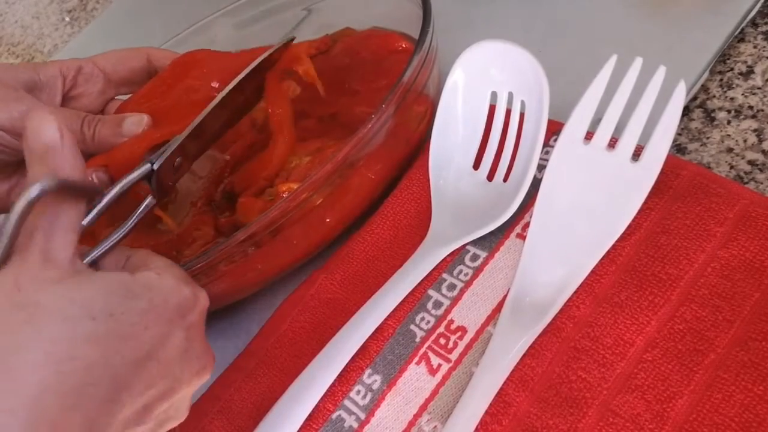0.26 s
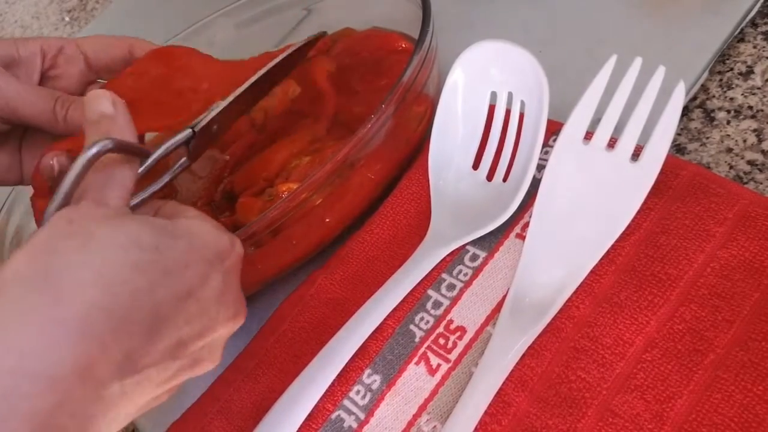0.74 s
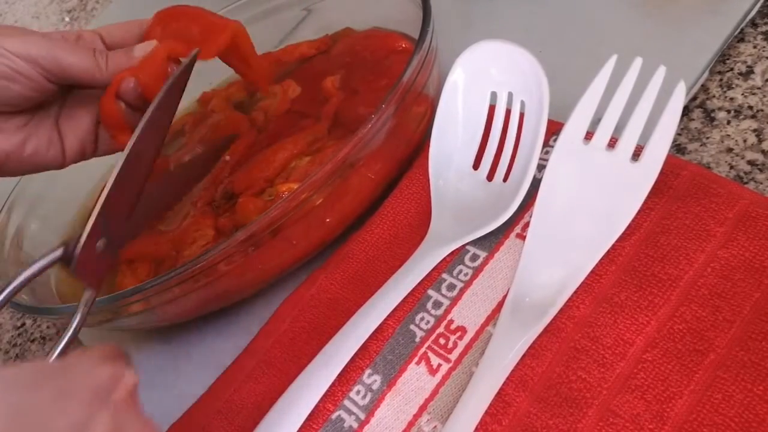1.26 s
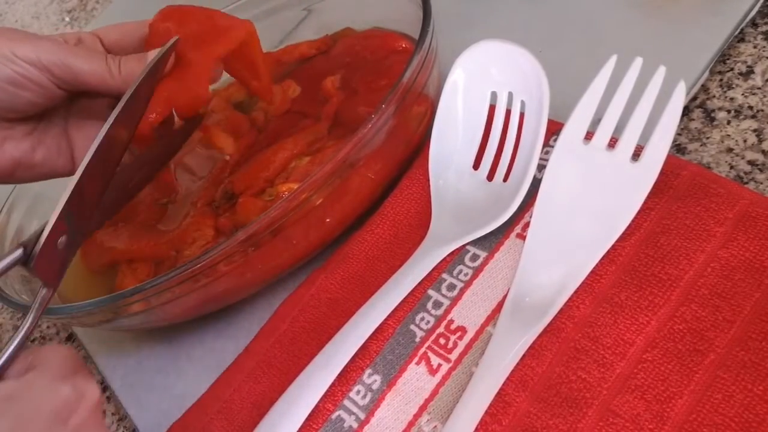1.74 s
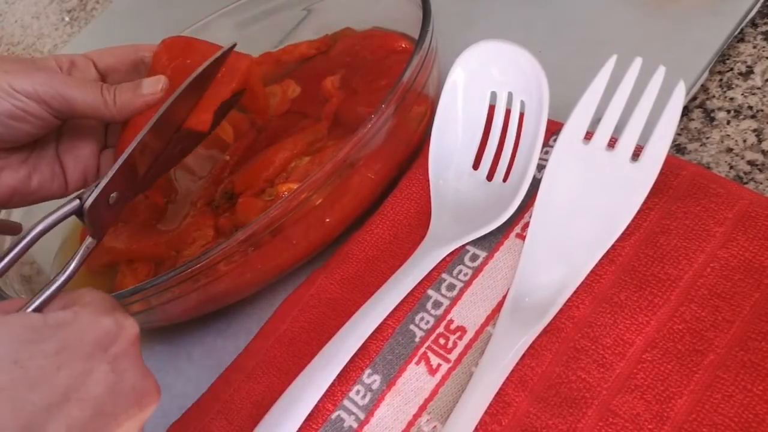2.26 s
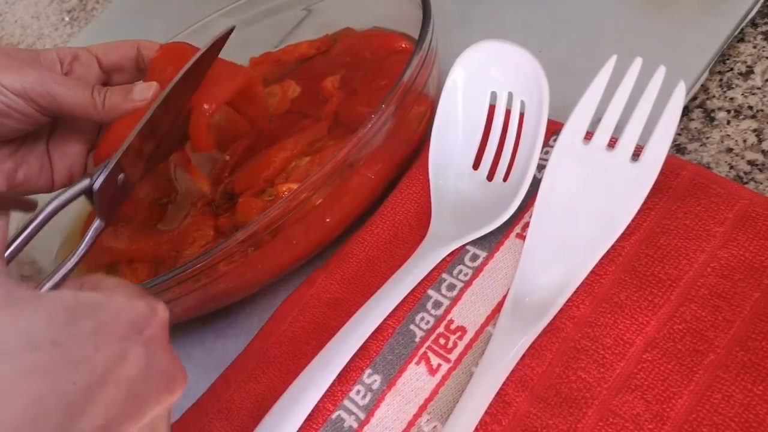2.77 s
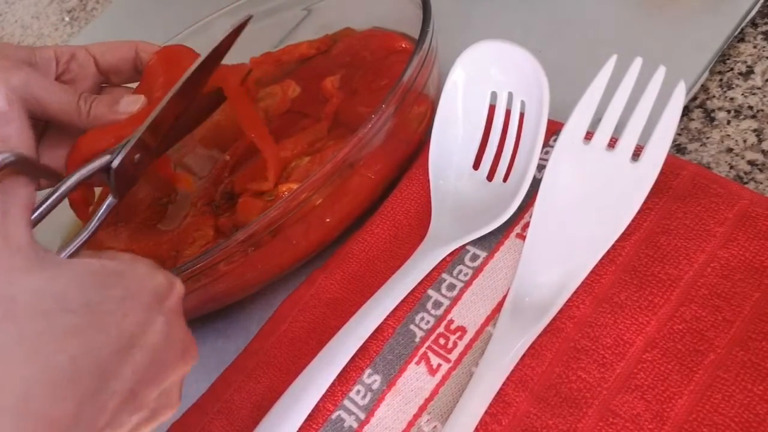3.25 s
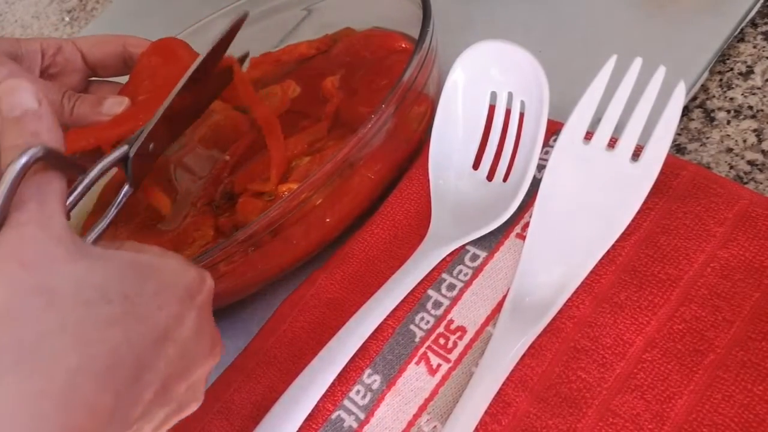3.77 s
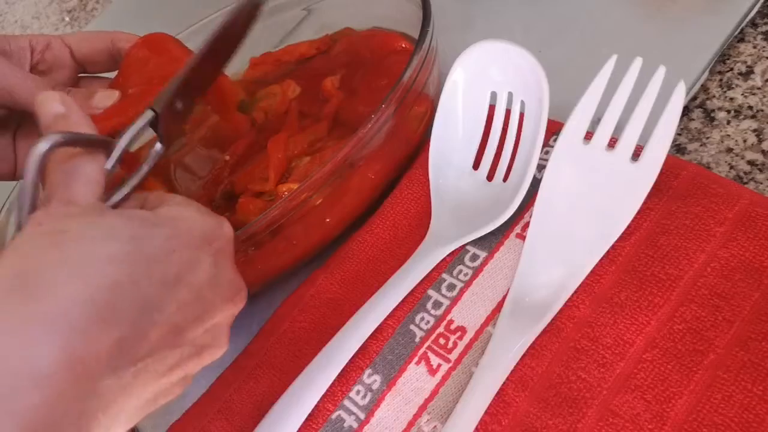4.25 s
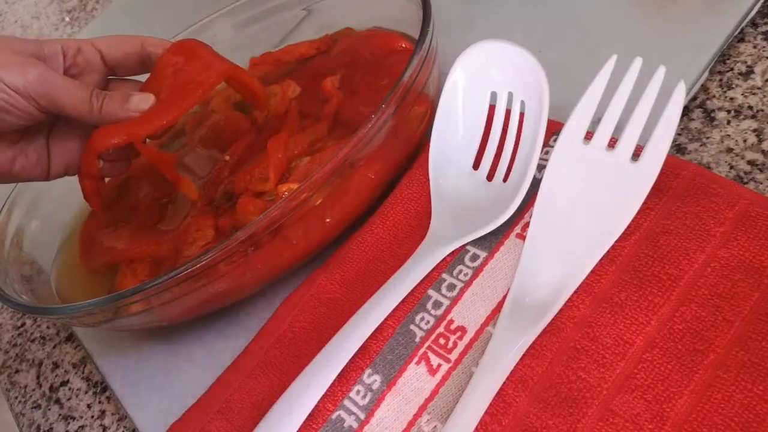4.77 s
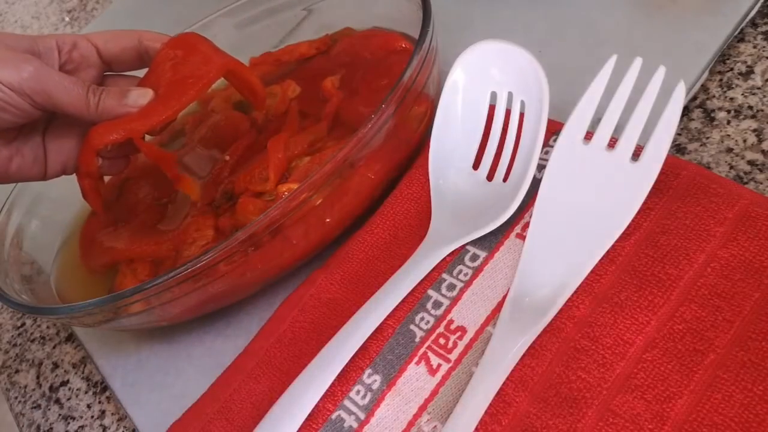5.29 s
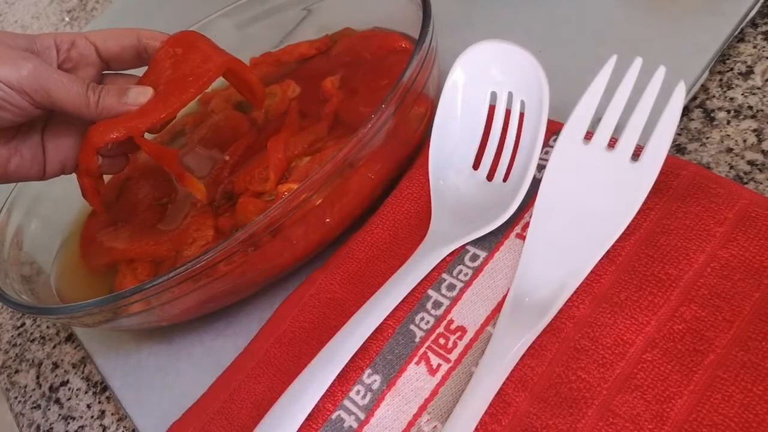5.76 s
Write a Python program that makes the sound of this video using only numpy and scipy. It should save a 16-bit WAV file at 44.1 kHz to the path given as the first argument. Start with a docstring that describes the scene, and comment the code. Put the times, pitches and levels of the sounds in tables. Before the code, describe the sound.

A very quiet kitchen with soft hiss and low rumble. Scissor blades scrape briefly and snap sharply, then steel knocks a glass dish with a short clear ring. Faint rubbing and tiny clicks follow while soft food is cut, then a second bright snap. All sound cuts out for an instant, returns with a faint scrape, and sinks away. Close stereo microphone, scissors slightly right, small room.

```python
"""Steel kitchen scissors cut soft peppers in a glass dish, a little to the right in the stereo picture.
Filtered noise makes a soft kitchen hiss, drone and rumble from the start, with faint wavering sine hums.
Blades rub as swelling grainy noise, with sine squeaks and a dull rustle; two loud snaps and some faint ones
ring the blade modes, one knock rings the glass after the first loud snap, and a small room answers.
Late on, all sound drops out for a moment; the background sinks towards the end."""
import sys
import numpy as np
from scipy import signal
from scipy.fft import rfft, irfft, next_fast_len
from scipy.io import wavfile
from scipy.ndimage import uniform_filter1d

SR = 44100
rng = np.random.default_rng(int(sys.argv[2]) if len(sys.argv) > 2 else 0)


def dump(signal):
    """Clip the signal to [-1, 1] and save it as 16-bit WAV at the path in sys.argv[1]."""
    limited = np.clip(np.atleast_2d(signal).T, -1, 1)
    pcm = np.round(limited * 32767).astype(np.int16)
    wavfile.write(sys.argv[1], SR, pcm)


N = 265570
SIZE = next_fast_len(N, real=True)
T = np.arange(N) / SR  # s, every sample
MS = np.arange(0, N / SR, .001)  # s, every millisecond


def undb(db):
    """Amplitude factor of a level in dB."""
    return 10 ** (np.asarray(db) / 20)


def level(x, db):
    """The sound scaled to an rms level in dB."""
    return x * undb(db) / np.sqrt(np.mean(x ** 2))


def peak_of(sound):
    """Loudest rms over 128 samples, both channels together."""
    power = uniform_filter1d(np.mean(sound ** 2, axis=0), size=128)
    return np.sqrt(np.max(power))


def on_log_axis(table, size):
    """Gain at each bin of a transform from (Hz, dB) points."""
    hz, db = np.transpose(table)
    bins = np.fft.rfftfreq(size, 1 / SR) + 1
    return undb(np.interp(np.log(bins), np.log(hz), db))


def coloured(x, gain):
    """Each bin of the sound scaled by a gain."""
    return irfft(rfft(x, SIZE) * gain, SIZE)[..., :N]


def noise(table):
    """Steady noise of the given colour, rms 1."""
    return level(coloured(rng.standard_normal(SIZE), on_log_axis(table, SIZE)), 0)


def causal(table, size=1024):
    """Short causal response of the given colour, from the folded cepstrum."""
    ceps = irfft(np.log(on_log_axis(table, size)), size)
    ceps[1:size // 2] *= 2
    ceps[size // 2 + 1:] = 0
    return irfft(np.exp(rfft(ceps)), size)


def band(x, low_hz, high_hz):
    """The sound through a gentle band-pass."""
    edges = [low_hz, min(high_hz, .45 * SR)]
    return signal.sosfilt(signal.butter(2, edges, "band", fs=SR, output="sos"), x)


def walk(rate):
    """Random levels, a new one every 1 / rate s, joined by straight lines."""
    count = int(N / SR * rate) + 2
    return np.interp(T * rate, np.arange(count), rng.standard_normal(count))


def panned(x, pan_db):
    """The sound in stereo, pan_db louder on the left than on the right."""
    return x * undb(np.array([[pan_db / 2], [-pan_db / 2]]))


SKIRT_DB, SKIRT_STRETCH = -31, 7.0  # a faint drag around every swell, this much lower and slower


def swell(s, db, rise, fall):
    """Gain that climbs and sinks evenly in dB, on a low slow skirt; one value a millisecond."""
    away = np.where(MS < s, (s - MS) / rise, (MS - s) / fall)
    return undb(db - 20 * away) + undb(db + SKIRT_DB - 20 * away / SKIRT_STRETCH)


# Colour of the hiss. Each row: frequency in Hz, density in dB per Hz (relative).
KITCHEN_COLOUR = [(240, -39), (400, -6), (570, -4), (666, -6), (765, -2), (1030, -3.5), (1440, -2.5),
                  (1840, -0.5), (3160, -10), (5600, -16), (6340, -17), (14400, -26), (16000, -32)]
# Stereo width of hiss and drone. Each row: frequency in Hz, side minus mid in dB.
KITCHEN_WIDTH = [(60, -26), (110, -24.5), (200, -15), (380, -0.5), (700, 4.5), (1290, -5), (2380, 3),
                 (4400, -0.5), (8120, 0), (15000, 0)]
# Colours of the drone, the deep rumble and the boom. Each row: frequency in Hz, density in dB per Hz (relative).
DRONE_COLOUR = [(91, -31.5), (155, 1), (167, -6.5), (204, -3.5), (231, -2.5), (254, -14), (302, -8.5),
                (328, -17.5), (363, -14), (394, -27), (410, -28.5), (530, -56.5), (900, -120)]
DEEP_COLOUR = [(8, -42), (14, -8), (25, -7), (33, -4), (38, -1), (45, -4), (54, -9.5), (64, -23.5),
               (90, -55), (150, -120)]
BOOM_COLOUR = [(35, -33.5), (60, -5.5), (65, -7.5), (92, 0), (108, 5.5), (145, -8), (165, -20), (210, -51),
               (360, -120)]
# Rise and fall of the rumble. Each row: time in seconds, deep rumble in dB, boom in dB (both before trims).
RUMBLE_LEVELS = [(0.0, -55, -64), (0.6, -54, -62), (0.9, -54.5, -64), (1.1, -52, -58), (1.3, -58, -61),
                 (1.9, -56, -60), (2.5, -56, -60), (3.1, -56, -57.5), (3.7, -60, -56.5), (4.0, -54, -55),
                 (4.2, -65, -64), (4.6, -54, -59), (4.86, -48, -61), (5.15, -55, -56), (5.6, -58, -59),
                 (6.02, -61, -62)]
HISS_DB, DRONE_DB, SIDE_BOOM_DB = -79.5, -74, -85.5  # before the background fade
RUMBLE_TRIM_DB, RUMBLE_WAVER_DB, RUMBLE_WAVER_PER_S = -3.5, 1.2, 5.5


def hiss_and_drone():
    """Two coloured noises: the hiss level wavers, the drone stays steady."""
    hiss = undb(HISS_DB + 0.95 * walk(4.1)) * noise(KITCHEN_COLOUR)
    return hiss + undb(DRONE_DB) * noise(DRONE_COLOUR)


def kitchen():
    """A hiss that differs left and right, over a drone and rumble that are nearly alike on both sides."""
    mid, side = hiss_and_drone(), hiss_and_drone()
    side = coloured(side, on_log_axis(KITCHEN_WIDTH, SIZE))
    side = side + undb(SIDE_BOOM_DB) * noise(BOOM_COLOUR)
    s, deep_db, boom_db = np.transpose(RUMBLE_LEVELS)
    for db, colour in ((deep_db, DEEP_COLOUR), (boom_db, BOOM_COLOUR)):
        waver_db = RUMBLE_WAVER_DB * walk(RUMBLE_WAVER_PER_S)
        mid = mid + undb(np.interp(T, s, db) + RUMBLE_TRIM_DB + waver_db) * noise(colour)
    return np.array([mid + side, mid - side])


# Faint background tones that come and go. Each row: start in seconds, end in seconds, first pitch in Hz,
# last pitch in Hz, level in dB (before the background fade).
HUM_TONES = [(-.2, 3.7, 40.84, 35.83, -54), (-.2, 0.76, 202, 196.9, -72), (-.1, 1.13, 112, 128.2, -66.5),
             (1.2, 2.22, 131, 138, -65), (1.1, 2.9, 100, 102.8, -66.5), (2.9, 4.15, 86.6, 80.2, -64),
             (1.0, 2.58, 228.4, 224.2, -76.5), (1.2, 2.67, 300.8, 301.2, -85), (2.3, 3.08, 1880, 1879, -85),
             (2.5, 3.9, 1180, 1170, -89), (3.2, 3.4, 876, 803, -92)]


def hums():
    """Sines that fade in and out while their level and pitch waver."""
    out = np.zeros(N)
    for start, end, first_hz, last_hz, db in HUM_TONES:
        done = np.clip((T - start) / (end - start), 0, 1)
        hz = (first_hz + (last_hz - first_hz) * done) * (1 + .012 * walk(7.3))
        fade = np.clip(5 * np.minimum(done, 1 - done), 0, 1)
        tone = np.sin(2 * np.pi * (np.cumsum(hz) / SR + rng.random()))
        out += fade * undb(db + 0.91 * walk(9)) * tone
    return out


# Gain of everything behind the scissors. Each row: time in seconds, gain in dB.
BACKGROUND_FADE = [(5.0, 4), (5.5, 2), (5.8, 2.5), (6.02, -1)]


def background():
    """Kitchen and hums under one gain that sinks towards the end."""
    return (kitchen() + hums()) * undb(np.interp(T, *np.transpose(BACKGROUND_FADE)))


# Blades sliding over each other. Each row, one stroke: peak in seconds, swell level in dB, centre of the
# scrape in Hz, rise in seconds per 20 dB, fall in seconds per 20 dB.
BLADE_STROKES = [(0.112, -84, 6100, .18, .12), (0.19, -81, 7050, .06, .047), (0.352, -84, 6900, .1, .2),
                 (0.751, -46.5, 8000, .013, .014), (0.938, -49, 7900, .0095, .03),
                 (2.466, -78, 6800, .16, .14), (2.606, -80, 6500, .024, .19), (2.97, -74, 7500, .14, .11),
                 (3.114, -72, 6600, .009, .1), (3.55, -83, 6900, .25, .17), (3.718, -77, 7100, .04, .09),
                 (4.204, -53.5, 7500, .021, .019), (4.394, -52, 9470, .01, .021),
                 (4.468, -67, 6200, .021, .064), (5.0, -65, 9300, .05, .04), (5.202, -80.5, 7000, .1, .075)]
# Resonances of the blades. Each row: frequency in Hz, width in Hz, level in dB (used by the snaps only).
BLADE_RESONANCES = [(1620, 300, -19), (5600, 300, -7.5), (7580, 1200, -10), (9430, 450, 3),
                    (11800, 500, -12), (12500, 500, -14)]


def rubbing():
    """Dense slips along the edges hiss around the centre of the scrape and ring the blade modes near it."""
    swells = [swell(s, db, rise, fall) for s, db, _, rise, fall in BLADE_STROKES]
    swells = np.array(swells) + 1e-12  # keeps the average below defined
    # the louder a stroke is, the more it pulls the centre to its own
    centre = np.array(BLADE_STROKES)[:, 2] @ swells ** 2 / np.sum(swells ** 2, axis=0)
    centre = np.interp(T, MS, centre)
    gain = np.interp(T, MS, swells.sum(0))
    slips = rng.standard_normal((2, N)) * undb(0.93 * rng.exponential(size=N))
    out = level(band(slips, 1500., 13000.0), -5)
    for hz in 3000 * 2 ** np.arange(0, 2.6, .5):
        near = np.exp(-(np.log2(hz / centre) / 0.42) ** 2)
        out += level(band(slips, hz / 1.3, hz * 1.1), -3) * near
    for hz, width, _ in BLADE_RESONANCES:
        near = np.exp(-(np.log2(hz / centre) / 0.56) ** 2)
        out += level(band(slips, hz - width / 2, hz + width / 2), -14) * near
    flicker = undb(2.5 * walk(210) - 1.5)
    return panned(gain * flicker * out, -5)


# Short narrow squeaks from the blades. Each row: peak in seconds, pitch in Hz, level in dB (before flutter
# and pan), length in seconds.
BLADE_SQUEAKS = [(.16, 11300, -84, 0.037), (.948, 2310, -53, 0.012), (2.43, 11050, -85, 0.045),
                 (2.68, 8680, -85, 0.033), (2.935, 10540, -83, 0.043), (2.96, 7600, -82, .04),
                 (3.015, 6200, -80.5, .04), (3.119, 3220, -64.5, 0.0089), (3.122, 6650, -67, 0.016),
                 (3.17, 11100, -83, 0.033), (3.62, 10440, -84.5, 0.063), (3.72, 5420, -80, .02),
                 (4.475, 6390, -67, 0.015), (5.0, 11300, -69.5, .03), (5.21, 9430, -87, .07)]
SQUEAK_FLUTTER_DB, SQUEAK_FLUTTER_PER_S = 3.2, 180


def squeaks():
    """Each squeak is a sine that swells, wavers in pitch, flutters in level and dies."""
    out = np.zeros(N)
    for s, hz, db, length in BLADE_SQUEAKS:
        start = int((s - length) * SR)
        t = np.arange(int(2 * length * SR)) / SR
        drift = uniform_filter1d(rng.standard_normal(len(t)), size=200) * np.sqrt(200)
        tone = np.sin(2 * np.pi * np.cumsum(hz * (1 + .02 * drift)) / SR)
        bump = np.exp(-((t - length) / (0.7 * length)) ** 2)
        out[start:start + len(t)] += undb(db) * bump * tone
    flutter = undb(SQUEAK_FLUTTER_DB * (walk(SQUEAK_FLUTTER_PER_S) - .4))
    return panned(out * flutter, -4.5)


# A dull rustle. Each row: peak in seconds, swell level in dB, rise in seconds per 20 dB, fall in seconds per 20 dB.
RUSTLE_SWELLS = [(.752, -59, .012, .012), (.945, -72, .028, .033), (1.46, -80, .16, .14),
                 (3.114, -69, .006, .06), (4.95, -73.5, .3, .1)]


def rustle():
    """Soft grainy noise in the low treble."""
    grains = rng.standard_normal((2, N)) * undb(2 * walk(60))
    gain = np.interp(T, MS, sum(swell(*row) for row in RUSTLE_SWELLS))
    return gain * level(band(grains, 1600., 4500.), 3)


LEFT_LAG_S = .0001  # the left channel hears each mode this much later


def blows(events, modes, colour, crack_db, rattle_db, rattle_t60, scatter):
    """Each blow is a short chatter of contacts that rattles on: a broad crack, and the modes of the body."""
    out = np.zeros((2, N))
    t = np.arange(SR // 3) / SR
    crack = causal(colour)
    for s, db, pan_db, chatter in events:
        force = t / chatter * np.exp(-2 * t / chatter)
        force = force + undb(rattle_db - 60 * t / rattle_t60) * np.clip(t / chatter, 0, 1)
        contacts = rng.standard_normal((2, len(t))) * np.sqrt(rng.exponential(size=len(t))) * force
        broad = signal.fftconvolve(contacts, crack[None], axes=1)[:, :len(t)]
        broad = panned(broad, pan_db)
        tones = 0
        for hz, mode_db, t60, mode_pan_db in modes:
            cycles = hz * (t - np.array([[LEFT_LAG_S], [0]]))
            cycles = cycles + rng.random() + scatter * rng.standard_normal((2, 1))
            ring = undb(mode_db - 60 * t / t60) * np.sin(2 * np.pi * cycles)
            tones = tones + panned(ring, mode_pan_db)
        tones = tones * (1 - np.exp(-(t / (.4 * chatter)) ** 2))  # soft onset
        sound = tones / peak_of(tones) + undb(crack_db) * broad / peak_of(broad)
        start = int(s * SR)
        out[:, start:start + len(t)] += sound * undb(db) / peak_of(sound)
    return out


def blade_modes():
    """Rows of Hz, dB, t60 s, left minus right dB for the blades; a narrow resonance rings long."""
    return [(hz, db, np.log(1000) / (np.pi * width), -8) for hz, width, db in BLADE_RESONANCES]


# Steel meets steel. Each row: start in seconds, peak level in dB (before the stereo tilt), left minus right
# of the crack in dB, chatter in seconds.
SNAP_EVENTS = [(0.7702, -24.5, -5, 0.003), (2.9773, -66, -7, 0.003), (3.1123, -71, -3.5, 0.0026),
               (3.4431, -74, -6, 0.003), (3.72, -70, -14, 0.0028), (4.2218, -26.5, -7, 0.0026),
               (4.9684, -63, 7.5, 0.0036)]
# Colour of the crack. Each row: frequency in Hz, density in dB per Hz (relative).
CRACK_COLOUR = [(300, -25), (800, -27), (1700, -17), (4500, -19.5), (6000, -10), (9500, -7.5),
                (14500, -13.5), (16000, -29)]


def snaps():
    """Blades striking each other: a bright crack over the ringing blade modes."""
    return blows(SNAP_EVENTS, blade_modes(), CRACK_COLOUR,
                 crack_db=4.5, rattle_db=-30.5, rattle_t60=0.12, scatter=0.15)


# Steel on glass. Each row: start in seconds, peak level in dB, left minus right of the thud in dB, chatter in seconds.
KNOCK_EVENTS = [(1.0355, -16, -5, 0.0045)]
# Modes of the glass dish. Each row: frequency in Hz, level in dB (relative), t60 in seconds, left minus right in dB.
DISH_MODES = [(490, -39, .16, -1), (590, -35, .12, -2), (1176, -11, .06, -8), (1228, -19, .24, -6),
              (1240, -24, .2, 0), (1942, 0, .155, -6), (2125, -13, .07, -3), (2762, -9, .12, -4),
              (3724, -13, .18, -2), (3741, -19, .2, 0), (4813, -20, .19, -12), (4829, -26, .2, -6),
              (5641, -22, .14, -2), (5830, -18, .13, -12), (6023, -18, .2, 5), (6654, -36, .14, -10),
              (7343, -18, .15, -7), (7800, -30, .13, -10), (8843, -25, .11, -12), (9717, -35, .14, -18),
              (10430, -35, .11, -18)]
# Colour of the thud. Each row: frequency in Hz, density in dB per Hz (relative).
THUD_COLOUR = [(200, -24), (550, -19), (900, -25), (1300, -11), (2100, -5), (3000, -12), (6000, -14.5),
               (9000, -19), (16000, -32)]


def knocks():
    """Steel striking the dish: a thud over the ringing glass modes."""
    return blows(KNOCK_EVENTS, DISH_MODES, THUD_COLOUR,
                 crack_db=-5, rattle_db=-25, rattle_t60=.2, scatter=.03)


# Decay of the room. Each row: band centre in Hz, t60 in seconds, level in dB.
ROOM_BANDS = [(720, .2, -14), (2000, 0.16, -9), (5000, 0.22, -10), (11000, .19, -10)]


def room(dry):
    """Scattered echoes off dish, worktop and walls, unrelated left and right: decaying bands of noise."""
    t = np.arange(SR // 2) / SR
    onset = np.clip(t / .002, 0, 1)
    tail = 0
    for hz, t60, db in ROOM_BANDS:
        decay = onset * np.exp(-np.log(1000) * t / t60)
        decay = decay / np.sqrt(np.sum(decay ** 2))
        scatter = band(rng.standard_normal((2, len(t))), hz / 3.8, hz * 1.3)
        tail = tail + undb(db) * scatter * decay
    return signal.fftconvolve(dry.mean(0)[None], tail, axes=1)[:, :N]


# Stereo tilt of snaps, rubbing and echoes. Each row: frequency in Hz, left minus right in dB.
STEREO_TILT = [(700, -2), (1600, -2), (3000, 1), (5600, 0), (7500, -3), (9400, -7), (12000, 6), (14500, 3)]


def shaded(x):
    """Left and right are coloured unevenly, each by half of the tilt."""
    half = np.sqrt(on_log_axis(STEREO_TILT, SIZE))
    return coloured(x, np.array([half, 1 / half]))


def scene():
    """Scissors and dish with their echoes, over the kitchen background."""
    behind = background()
    steel = rubbing() + snaps()
    thin = squeaks()
    glass = knocks()
    # knock and squeaks go to the room 12 dB lower, so they stay drier than snaps and rubbing
    echoes = room(steel + undb(-12) * (glass + thin))
    return shaded(steel + echoes) + thin + glass + rustle() + behind


# The moment of silence: its start and its end, both in seconds.
SILENCE_S = (4.69694, 4.83627)
TOP_HZ = 16100


def record(dry):
    """All sound drops out for a moment, and a steep low-pass cuts the top."""
    running = (T < SILENCE_S[0]) | (T >= SILENCE_S[1])
    low_pass = signal.ellip(10, .2, 80, TOP_HZ, fs=SR, output="sos")
    return signal.sosfilt(low_pass, dry * running)


dry = scene()
out = record(dry)
dump(out)
```